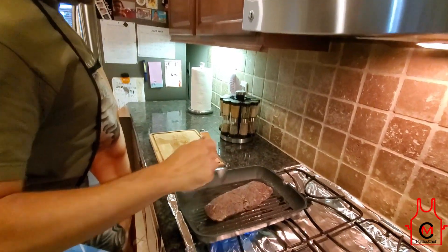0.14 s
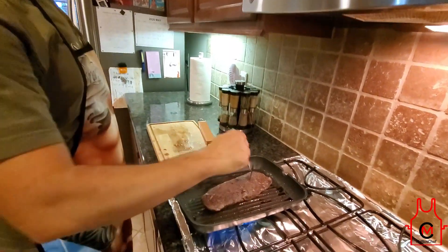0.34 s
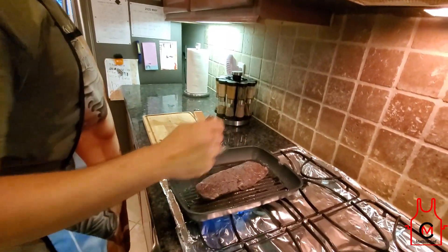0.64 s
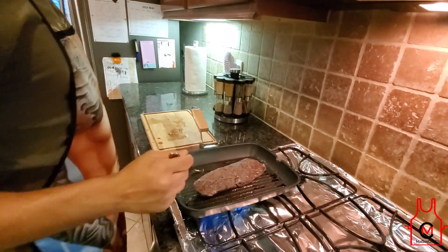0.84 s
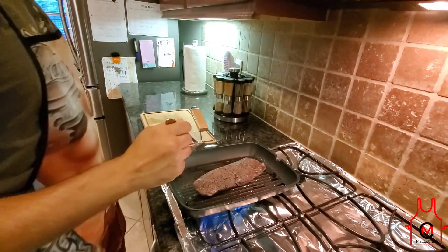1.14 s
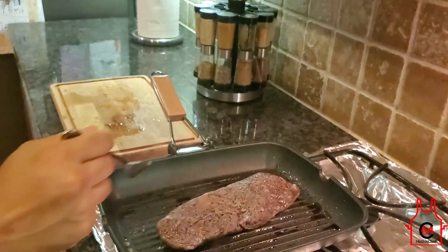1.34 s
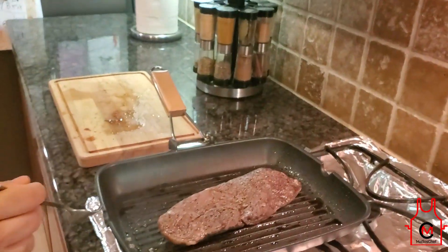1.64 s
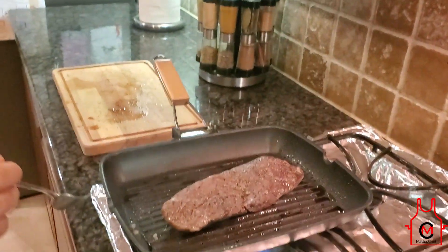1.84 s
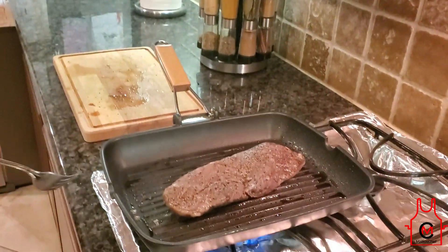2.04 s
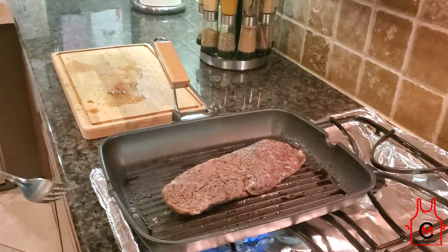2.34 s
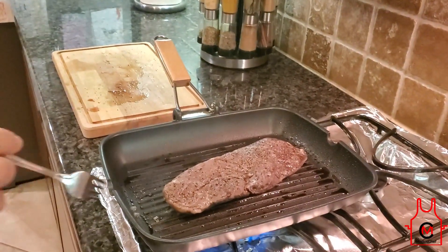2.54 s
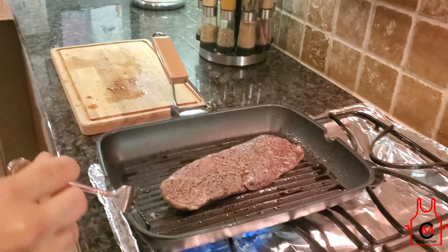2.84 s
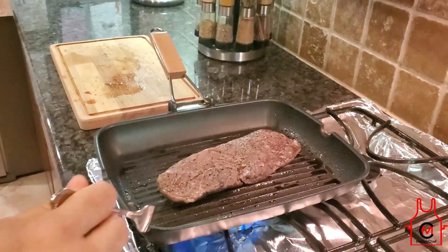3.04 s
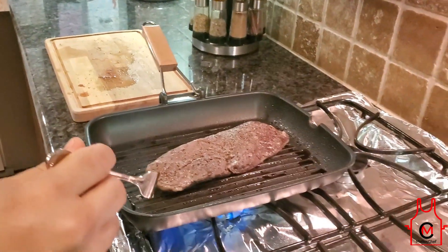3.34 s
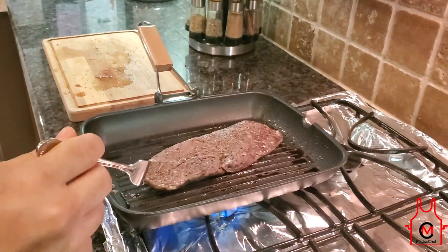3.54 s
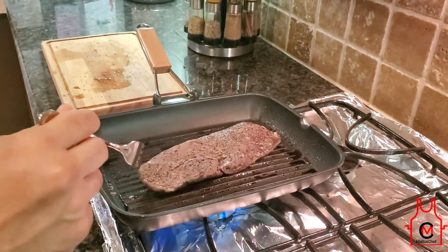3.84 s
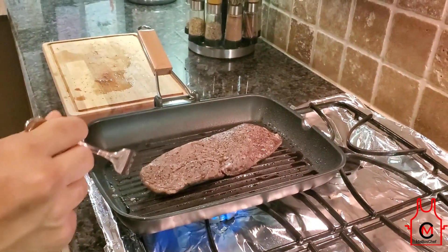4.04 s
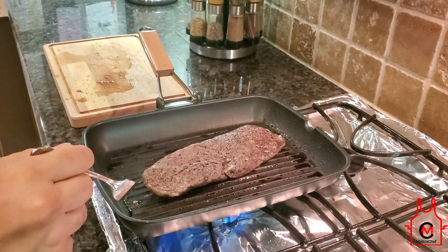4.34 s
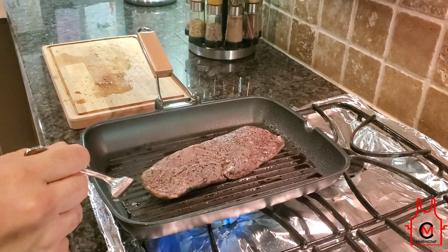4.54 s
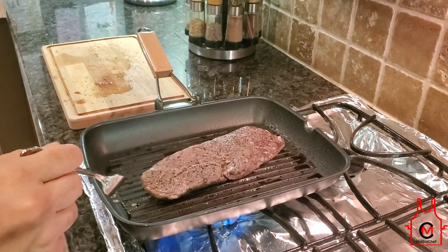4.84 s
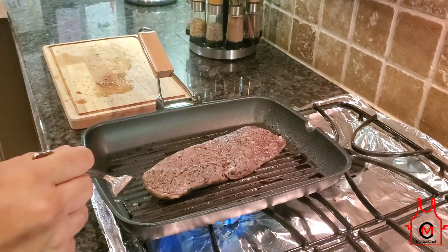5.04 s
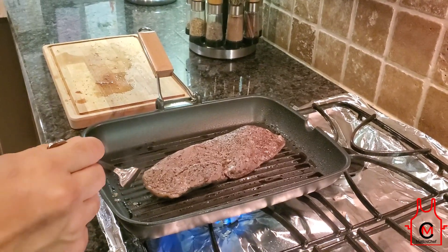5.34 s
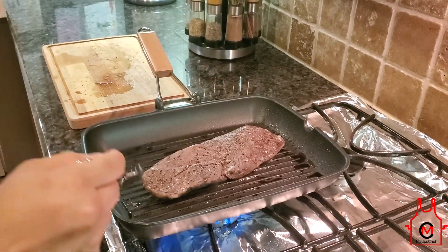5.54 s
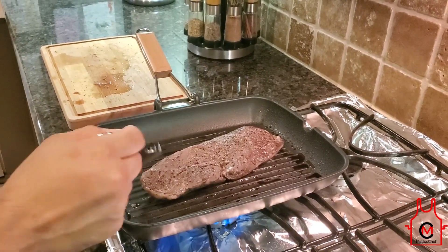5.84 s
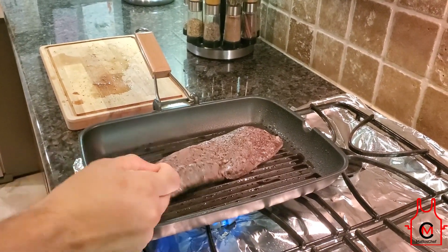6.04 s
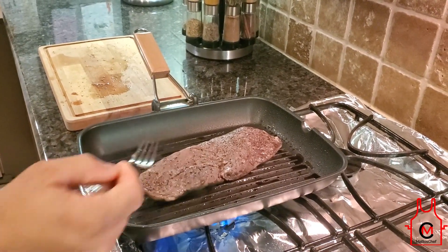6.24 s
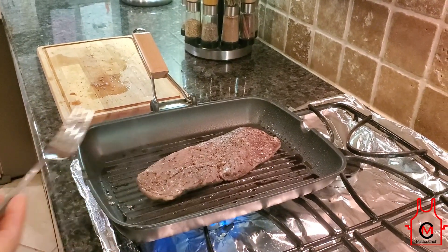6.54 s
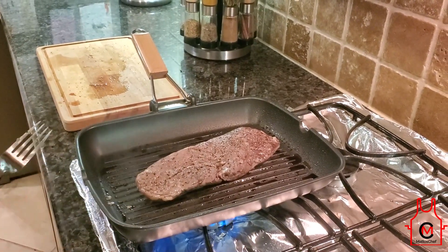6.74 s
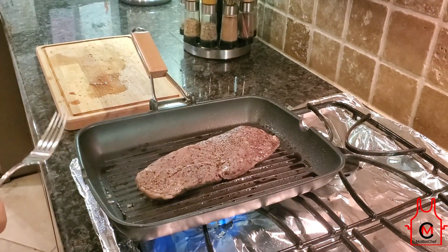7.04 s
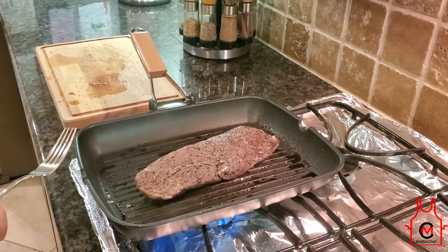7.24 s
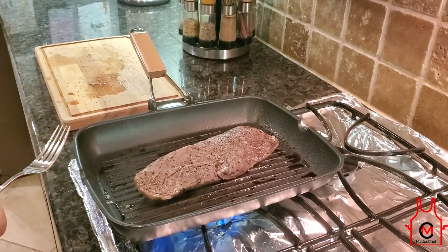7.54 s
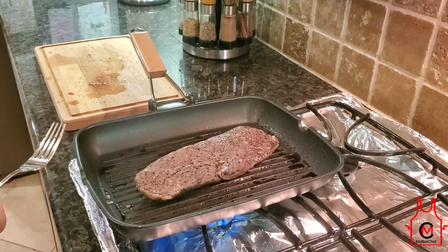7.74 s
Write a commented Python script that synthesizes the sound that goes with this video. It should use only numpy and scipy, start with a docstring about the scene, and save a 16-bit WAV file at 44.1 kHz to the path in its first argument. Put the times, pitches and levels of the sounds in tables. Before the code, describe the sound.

Meat sears in a ridged pan on a gas hob in a tiled kitchen. A dense, bright sizzle opens strong, surges around half a second with a cluster of sharp snaps and a dull knock, then settles into steady frying with scattered spits, small plops and brief wet surges. Soft deep bumps from the cook come early and near six seconds. A faint flame rumble and hum lie beneath. The stereo microphone gradually seems to move closer to the pan.

```python
"""A tiled kitchen: a steak sears in a ridged pan on a gas hob, and the sizzle slowly shifts to a closer one.
Tiny steam bubbles burst in the fat as a dense rain of noise puffs, surging when juice meets the iron.
Bigger bubbles ring briefly; sharp snaps are bursts of noise, and plops and knocks soft, dull resonances.
Under it the flame rumbles as filtered noise, the cook's moves bump softly as short deep tones,
and a mains hum, two faint mid tones and a whine sound as slightly unsteady sine tones."""
import sys
import numpy as np
from scipy import signal
from scipy.fft import rfft, irfft, next_fast_len
from scipy.io import wavfile
from scipy.ndimage import uniform_filter1d, map_coordinates

SR = 44100
rng = np.random.default_rng(int(sys.argv[2]) if len(sys.argv) > 2 else 0)


def waveform_to_disk(signal):
    """Save audio, clipped to [-1, 1], as 16-bit WAV at the path in sys.argv[1]."""
    frames = np.transpose(np.atleast_2d(signal))
    scaled = np.clip(frames, -1, 1) * 32767
    samples = np.round(scaled).astype(np.int16)
    wavfile.write(sys.argv[1], SR, samples)


N = 347949  # length in samples
SPATTER_DB = -36.5  # wet spatter at an ordinary boil


def amp(db):
    """Turn decibels into a gain."""
    return 10 ** (np.asarray(db) / 20)


def unit(x):
    """Scale so that the average of the channels has rms 1."""
    middle = np.atleast_2d(x).mean(0)
    return x / np.sqrt(np.mean(middle ** 2) + 1e-20)


def along(points, hz):
    """Read a curve of (Hz, value) points, with frequency on a log axis."""
    f, values = np.transpose(points)
    return np.interp(np.log(hz + 1), np.log(f + 1), values)


def wobble(rate):
    """A smooth random curve through `rate` random points a second."""
    points = rng.standard_normal(int(N * rate / SR) + 4)
    return map_coordinates(points, [np.arange(N) * rate / SR])


def filtered(x, response):
    """Multiply the spectrum of x by a function of frequency."""
    n = x.shape[-1]
    padded = next_fast_len(n + SR // 8, True)
    spectrum = rfft(x, padded) * response(np.fft.rfftfreq(padded, 1 / SR))
    return irfft(spectrum, padded)[..., :n]


def coloured(x, points, size=2048):
    """Filter x to a (Hz, dB) shape without any sound ahead of the event."""
    gain = amp(along(points, np.fft.rfftfreq(size, 1 / SR)))
    # folding the cepstrum forward in time gives a minimum-phase filter
    cepstrum = irfft(np.log(gain))
    cepstrum[1:size // 2] *= 2
    cepstrum[size // 2 + 1:] = 0
    impulse = irfft(np.exp(rfft(cepstrum)))
    return signal.oaconvolve(x, impulse[None], axes=1)[:, :x.shape[1]]


def spread(pair):
    """Blend two unrelated signals into left and right: mostly alike in the bass, less so in the treble."""
    # how alike left and right are: (f/Hz, correlation from -1 to 1)
    likeness = [(100, 0.83), (300, 0.8), (560, 0.51), (760, 0.7), (1050, 0), (1320, 0.54), (1760, -0.093),
                (2000, 0.25), (2700, 0.48), (3900, 0.12), (5500, -0.12), (6800, 0), (15000, -0.044)]

    def mid_and_side(hz):
        turn = np.arccos(np.clip(along(likeness, hz), -1, 1)) / 2
        return np.array([np.cos(turn), np.sin(turn)])
    mid, side = filtered(pair, mid_and_side)
    return np.array([mid + side, mid - side])


def add(out, s, sound):
    """Mix a short sound in at s seconds."""
    part = out[:, max(round(s * SR), 0):][:, :sound.shape[1]]
    part += sound[:, :part.shape[1]]


def by_chance(top_db, range_db, count):
    """(s, dB) rows of small events, one at a random moment in each equal slice of the scene."""
    when, size = rng.random((count, 2)).T
    times = (np.arange(count) + when) / count * N / SR
    return list(zip(times, top_db - range_db * size))


def closeness():
    """How near the listening point is: 0 beside the cook, 1 just over the pan."""
    start_s, takes_s = 0.82, 3.3
    return np.clip((np.arange(N) / SR - start_s) / takes_s, 0, 1)


def hob():
    """Burning gas rumbles unevenly, over the room's soft rush; both are shaped noise."""
    # colour of the flame's rumble: (f/Hz, level/dB)
    rumble_shape = [(20, -36), (38, -4), (65, 13.5), (95, 5.5), (150, 2), (300, -27), (700, -36)]
    # colour of the room's rush: (f/Hz, level/dB)
    air_shape = [(30, -5), (120, -1.5), (300, 10), (480, 2), (850, -4), (2000, -5), (8000, -42)]
    flame_db = -65.5 + 1.8 * wobble(4) + 1.1 * wobble(12)  # slow wandering and faster flutter
    flame = amp(flame_db) * unit(spread(coloured(rng.standard_normal((2, N)), rumble_shape)))
    air_db = -65 + 1.3 * wobble(2)
    air = amp(air_db) * unit(spread(coloured(rng.standard_normal((2, N)), air_shape)))
    return flame * amp([[-2], [2]]) + air  # the flame sits to the right


def steady_tones():
    """A mains hum, two faint mid tones and a whine: sines, slightly unsteady in pitch and level."""
    # mains hum and two faint mid tones: (f/Hz, average rms level/dB)
    low_and_mid_tones = [(59.8, -75), (119.9, -68), (784, -72), (902.5, -69)]
    whine_hz, far_db, near_db = 577, -64, -59  # rms levels beside the cook and over the pan
    t = np.arange(N) / SR

    def tone(hz, db, lead):
        """One tone that is `lead` radians ahead on the left."""
        phase = 2 * np.pi * hz * t + 0.28 * wobble(6) + hz / 1000 * 0.17 * wobble(14)
        sides = np.array([[lead], [-lead]]) / 2
        return amp(db + wobble(3.05) / 2) * np.sqrt(2) * np.sin(phase + sides)
    whine_db = far_db + (near_db - far_db) * closeness()
    whine = tone(whine_hz, whine_db, lead=1.0)
    return whine + sum(tone(hz, db, lead=0) for hz, db in low_and_mid_tones)


def bumps(rise, t60, rough):
    """The cook's moves: soft deep pushes that die within a few cycles, with a little rumble on them."""
    # bumps: (t/s, level of the tone before left-right balance/dB, f/Hz)
    bump_rows = [(.458, -49, 111), (.51, -53, 75), (.562, -47, 85), (1.072, -44.5, 80), (6.058, -45, 90),
                 (6.126, -50, 75), (6.19, -49, 94), (6.375, -49, 70), (7.246, -49, 80)]
    out, t = np.zeros((2, N)), np.arange(SR // 4) / SR
    shape = (1 - np.exp(-t / rise)) ** 2 * amp(-60 * t / t60)
    shape /= shape.max()
    for s, db, hz in bump_rows:
        noise = rng.standard_normal((2, len(t)))
        rumble = unit(coloured(noise, [(20, -20), (hz, 0), (220, -10), (500, -30)]))
        push = np.sin(2 * np.pi * hz * t) + rough * rumble
        add(out, s, amp(db) * push * shape)
    return out


def plops(t60, skirt_db):
    """Dull plops and knocks: soft blows with a broad, quickly dying resonance."""
    # the loudest plops: (t/s, rms level of the first 5 ms/dB, centre f/Hz)
    plop_rows = [(.151, -40, 1480), (.6535, -26.5, 1300), (1.584, -31, 1650), (1.685, -32.5, 1100),
                 (2.417, -39.5, 900), (3.215, -32.5, 1250), (3.261, -36, 890), (3.827, -41, 1860),
                 (4.306, -38, 1450), (5.252, -35, 1430), (7.061, -35.5, 1470)]
    out, t = np.zeros((2, N)), np.arange(SR // 8) / SR
    small = [(s, db, 1500) for s, db in by_chance(top_db=-42.5, range_db=5, count=12)]
    envelope = amp(-60 * t / t60) * (1 - np.exp(-t / 0.0006))
    for s, db, hz in [*plop_rows, *small]:
        blow = envelope * rng.standard_normal((2, len(t)))
        resonance = [(hz / 8, 2 * skirt_db), (hz / 2, -6), (hz, 0),
                     (hz * 2.2, -4), (hz * 4, skirt_db), (hz * 10, 2 * skirt_db)]
        blow = coloured(blow, resonance)
        start_rms = np.sqrt(np.mean(blow[:, :SR // 200] ** 2))
        add(out, s, amp(db) * blow / start_rms)
    return spread(out)


def snaps(crack_t60, splash_t60):
    """Sharp snaps and one duller knock, each a crack and a brief splash: two fading bursts of noise."""
    # snaps and the knock: (t/s, rms level of the first 1.5 ms/dB, treble over body/dB, splash over crack/dB)
    snap_rows = [(.14, -19, -3, -1), (.5267, -18, -18, -16), (0.6194, -19, -18, -14),
                 (.6523, -15.5, -38, -3), (0.7052, -16.5, -7, -14), (.7572, -21, -21, -6),
                 (.7615, -15.5, -15, -19), (0.9114, -23, -3, -6), (0.948, -20, -1, -12),
                 (1.955, -16, -4, -3), (2.7025, -19, -5, -12), (2.9073, -22, -13, -9),
                 (3.2328, -22, -8, -5), (4.0019, -25.5, -11, -5), (4.2425, -25, -17, -7),
                 (4.468, -17.5, -1, -9), (5.099, -24, -3, 1), (5.2522, -19, -18, -15),
                 (6.0602, -22, -13, -5), (6.208, -16.5, -2, -14), (6.394, -21, 0, -6),
                 (6.7743, -18.5, -6.5, -23), (7.3475, -20, -2, 0), (7.581, -22, -7, -10)]
    # colour of a snap: (f/Hz, level/dB)
    snap_shape = [(300, -24.5), (1000, -10.5), (2200, -2.5), (4500, -2), (6500, 6), (8500, 3), (15600, 5)]
    out, t = np.zeros((2, N)), np.arange(SR // 20) / SR
    # small chance spits, all with the same treble and splash
    spits = [(s, db, -5, -11) for s, db in by_chance(top_db=-23.5, range_db=8, count=24)]
    for s, db, treble_db, splash_db in [*snap_rows, *spits]:
        crack = amp(-60 * t / crack_t60)
        splash = amp(splash_db - 60 * t / splash_t60)
        puff = coloured((crack + splash) * rng.standard_normal((2, len(t))), snap_shape)
        puff = coloured(puff, [(6800, 0), (8500, treble_db)])
        start_rms = np.sqrt(np.mean(puff[:, :round(.0015 * SR)] ** 2))
        add(out, s, amp(db) * puff / start_rms)
    return spread(out)


def fizzing(rate, scatter_db, life, size=96):
    """The tiniest bubbles: a dense random rain of noise puffs, `rate` a second, each of its own size."""
    count = int(rate * N / SR)
    start = rng.integers(0, N, count)
    sizes = amp(scatter_db * (2 * rng.random(count) - 1))
    power = np.bincount(start, sizes ** 2, N)
    dying = np.exp(-2 * np.arange(size) / SR / life)
    power = np.convolve(power, dying)[:N]
    return unit(rng.standard_normal((2, N)) * np.sqrt(power))


def crackling(rate, scatter_db, cycles, centre_hz, octaves, size=128):
    """Larger bubbles: each rings for a few cycles at its own pitch, in its own phase on each side."""
    count = int(rate * N / SR)
    pitch, loudness, left, right = rng.standard_normal((4, count, 1))
    when = rng.integers(0, N, count)[:, None] + np.arange(size)
    hz = np.clip(centre_hz * 2 ** (octaves * pitch), 800, 16000)
    turns = hz * np.arange(size) / SR
    # low bubbles last longer, so they start gentler
    level = amp(scatter_db * np.minimum(loudness, 2)) * hz ** .75
    fade = level * np.exp(-turns / cycles)
    rings = [fade * np.sin(2 * np.pi * (turns + phase)) for phase in (left, right)]
    return unit(np.array([np.bincount(when.ravel(), ring.ravel(), N)[:N] for ring in rings]))


def patchy(x, patchy_db):
    """Random gains make small patches of the sizzle's spectrum swell and fade."""
    z = signal.stft(x, nperseg=1024)[2]
    field = uniform_filter1d(rng.standard_normal(z.shape[1:]), size=7, axis=0)  # blur over pitch
    field = uniform_filter1d(field, size=4, axis=1)  # blur over time
    depth_db = patchy_db * along([(3000, 1), (14000, .6)], np.fft.rfftfreq(1024, 1 / SR))
    gain = amp(depth_db[:, None] * field / field.std())
    return signal.istft(z * gain, nperseg=1024)[1][:, :N]


def kitchen(x, wet_db, t60):
    """Tiles and cupboards scatter each burst into a short wash: noise that follows the fading energy."""
    tail = amp(-120 * np.arange(SR // 4) / SR / t60)
    energy = np.abs(signal.oaconvolve(np.mean(x ** 2, axis=0), tail / tail.sum())[:N])
    return x + amp(wet_db) * np.sqrt(energy) * rng.standard_normal((2, N))


def boiling():
    """Levels (dB) of fizz, spatter and bubbling: a restless boil plus surges that rise, hold and die away."""
    # how hard the fat boils: (t/s, level of the fine fizz before surges and flutter/dB)
    boil = [(0, -30), (.3, -32.5), (1.1, -34), (2.05, -35.5), (3.1, -34), (3.7, -35), (4.8, -34),
            (5.65, -34), (6.8, -34.5), (7.89, -32.8)]
    # juice runs onto the iron: (t/s, hold/s, spatter level/dB, wetness = spatter over fizz/dB)
    surge_rows = [(-.02, 0.011, -37, -9), (0.446, 0.082, -30.5, 2), (0.593, 0.18, -36.5, -0.5),
                  (1.585, .02, -39.5, 3), (2.174, 0.09, -48, 12.5), (3.072, 0.011, -37, 4),
                  (3.864, .003, -33.5, 0), (4.025, 0.1, -39, -4.5), (4.28, 0.015, -40.5, -6),
                  (4.43, 0.051, -39, -5), (4.65, 0.06, -39.5, -4), (5.085, 0.16, -36.5, -1.5),
                  (5.425, 0.026, -38.5, -1), (6.037, 0.16, -33.5, -1), (7.03, .02, -36.5, 1)]
    attack_s, shortest_t60_s, lingers = 0.017, 0.098, 4.7  # lingers: further t60 per second of hold
    flutter_hz = 14
    t = np.arange(N) / SR
    boil_db = np.interp(t, *np.transpose(boil))
    heat_db = boil_db + 34.5  # above an ordinary boil
    power = amp([boil_db, SPATTER_DB + 0.51 * heat_db, -50 + 0.12 * heat_db]) ** 2
    for s, hold, db, wet_db in surge_rows:
        dying = np.maximum(t - s - attack_s - hold, 0) / (shortest_t60_s + lingers * hold)
        shape = np.clip((t - s) / attack_s, 0, 1) * amp(-60 * np.minimum(dying, 2))
        # a wetter surge has less fizz and more low bubbling
        levels_db = [db - wet_db, db, db - 12 + 0.98 * wet_db]
        power += np.outer(amp(levels_db) ** 2, shape ** 2)
    fizz_db, spatter_db, bubbling_db = 10 * np.log10(power) + 0.35 * wobble(flutter_hz)
    return fizz_db, spatter_db, bubbling_db + 0.54 * wobble(flutter_hz)


def sizzle():
    """A dense fizz and sparser crackles, ringing the pan; stronger spatter sounds lower."""
    # colour heard beside the cook: (f/Hz, level/dB)
    far_shape = [(200, -34.5), (550, -25), (900, -17.5), (1300, -12.5), (1700, -8), (2200, -2.5),
                 (2700, -4.5), (4000, -4), (5200, -1), (6100, 1.5), (6900, 1), (8300, -10), (10000, -7.5),
                 (13000, -7.5), (15600, -10)]
    # colour heard just over the pan: (f/Hz, level/dB)
    near_shape = [(300, -30), (700, -20.5), (1100, -15.5), (1700, -6), (2900, -1.5), (4200, -2), (5400, -1),
                  (6250, 3.5), (6900, 4.5), (7300, 0.5), (7800, -4), (9000, -5.5), (12000, -5.5),
                  (15600, -7.5)]
    # ring of the pan: (f/Hz, width/Hz, level/dB)
    pan_tones = [(1720, 35, 1), (1930, 50, -3), (3028, 70, -6)]
    fizz_db, spatter_db, bubbling_db = boiling()
    fizz = fizzing(rate=7200, scatter_db=1.5, life=0.00063)
    crackle = crackling(rate=500, scatter_db=2.5, cycles=1.0, centre_hz=4390, octaves=1.5)
    fat = kitchen(fizz + amp(-12) * crackle, wet_db=-3, t60=0.035)
    fat = spread(patchy(fat, patchy_db=1.37))

    def ring(f):
        return 1 + sum(amp(db) * 1j * f * w / (c * c - f * f + 1j * f * w) for c, w, db in pan_tones)

    def below(f, edge_hz):
        return 1 / (1 + (f / edge_hz) ** 12)
    near = unit(filtered(coloured(fat, near_shape), ring))
    far = unit(coloured(fat, far_shape))
    heard = closeness() * near + (1 - closeness()) * far
    # three bands, each with its own level: low bubbling, spatter, fine fizz
    bubbling = filtered(heard, lambda f: below(f, 1814))
    fine = filtered(heard, lambda f: 1 - below(f, 7490))
    spatter = heard - bubbling - fine
    # a surge favours the lower part of the spatter
    gurgle = filtered(spatter, lambda f: below(f, 3930))
    gurgle_gain = amp(0.12 * (spatter_db - SPATTER_DB))
    spatter = spatter + (gurgle_gain - 1) * gurgle
    return amp(fizz_db) * unit(fine) + amp(spatter_db) * unit(spatter) + amp(bubbling_db) * unit(bubbling)


def scene():
    """The hob, steady tones and bumps, with the pan's sounds balanced between left and right by pitch."""
    # balance of the pan: (f/Hz, left over right/dB)
    balance = [(300, 1), (900, 0), (1500, 5), (1900, 7), (2500, 2), (3300, 0), (4500, -7), (5600, 3.5),
               (6500, 3), (7200, 1), (8100, 7.5), (9400, -0.5), (13000, 1.5)]

    def sides(hz):
        lean_db = along(balance, hz)
        gains = amp(np.array([lean_db, -lean_db]) / 2)
        return gains / np.sqrt(np.mean(gains ** 2, axis=0))  # keep the total power
    background = hob() + steady_tones()
    moves = bumps(rise=0.0078, t60=0.094, rough=0.46) * amp([[-1.5], [1.5]])
    pan = plops(t60=0.092, skirt_db=-8.5) + snaps(crack_t60=.0048, splash_t60=0.064) + sizzle()
    return background + moves + filtered(pan, sides)


def record(dry):
    """Cut off everything from 15.8 kHz up."""
    return filtered(dry, lambda hz: hz < 15800)


dry = scene()
out = record(dry)
waveform_to_disk(out)
```